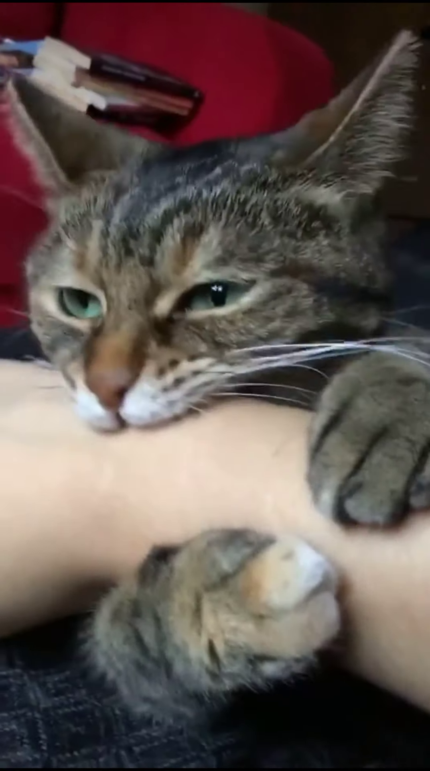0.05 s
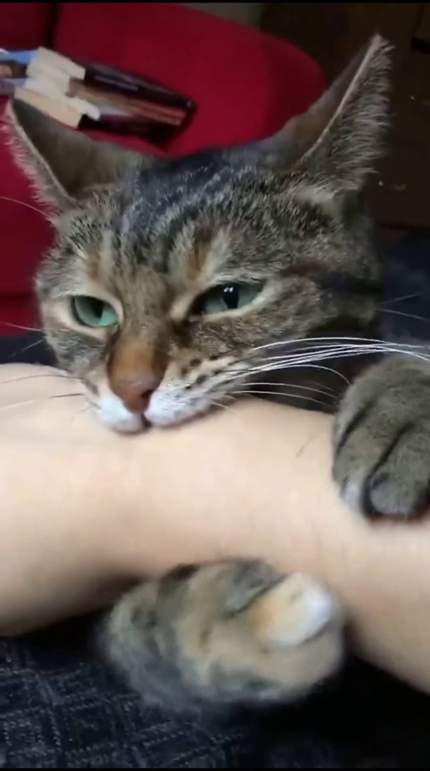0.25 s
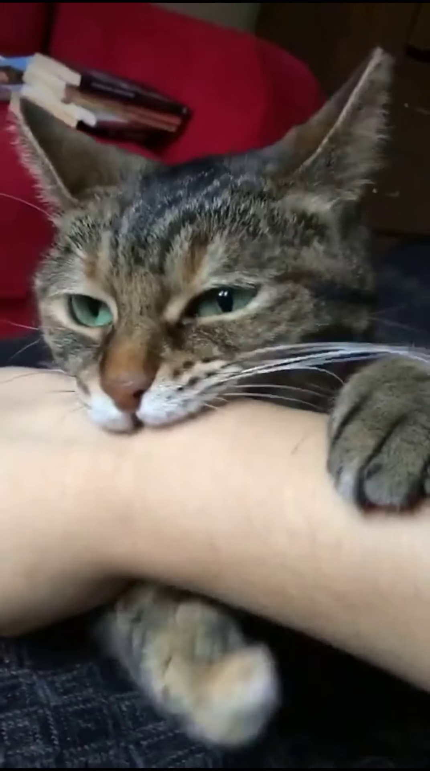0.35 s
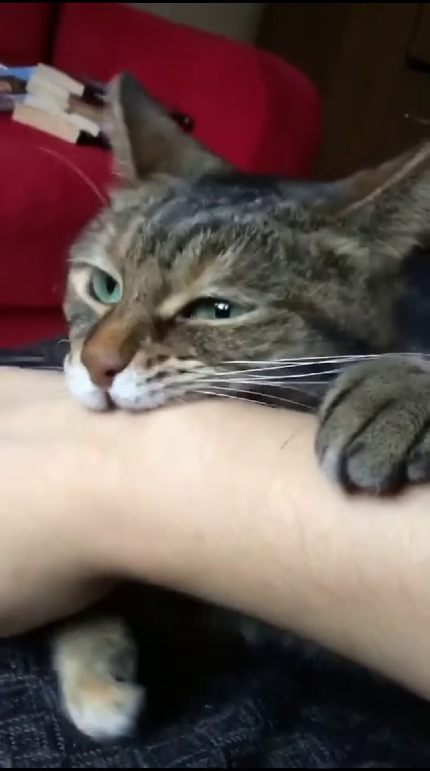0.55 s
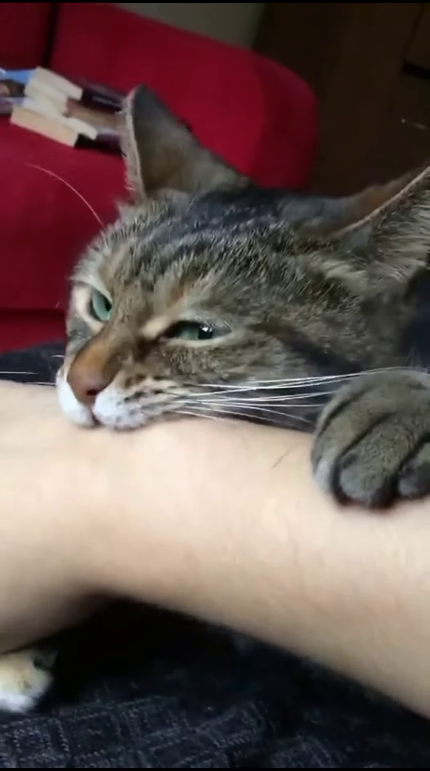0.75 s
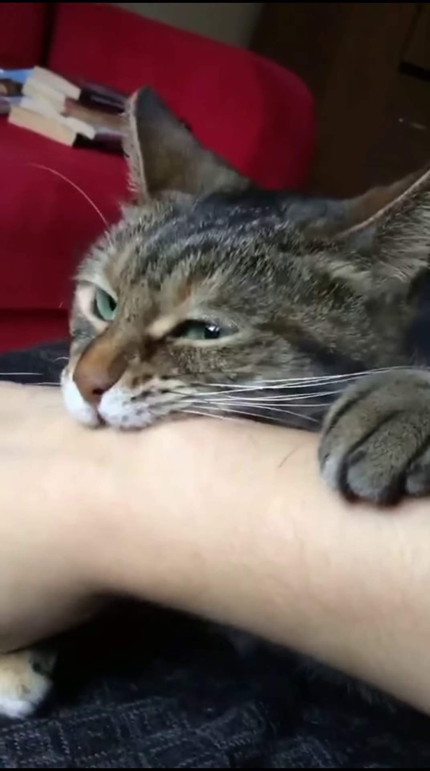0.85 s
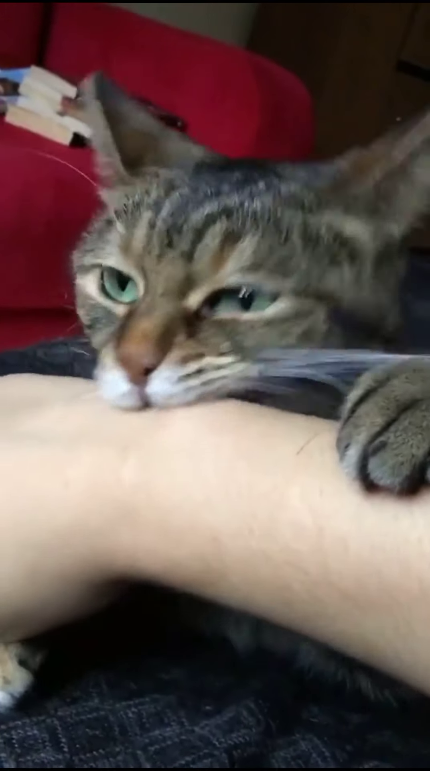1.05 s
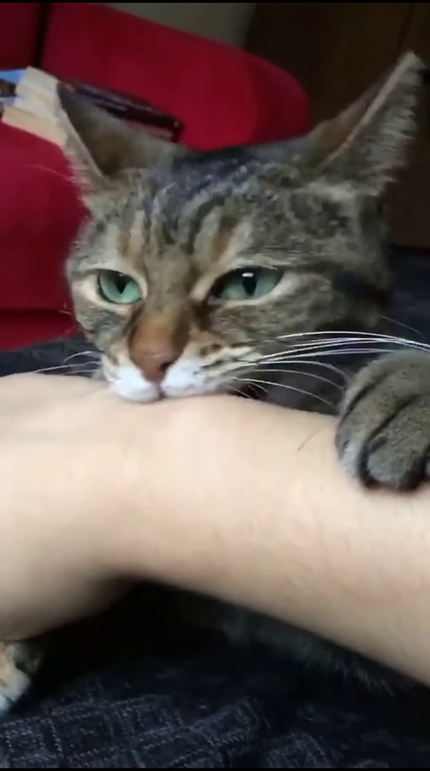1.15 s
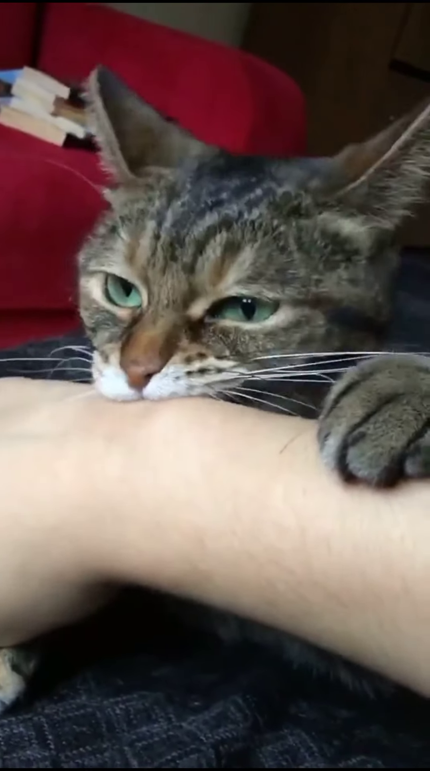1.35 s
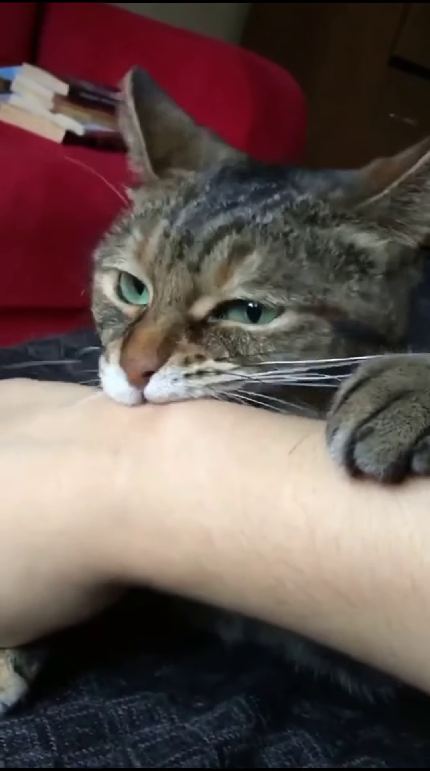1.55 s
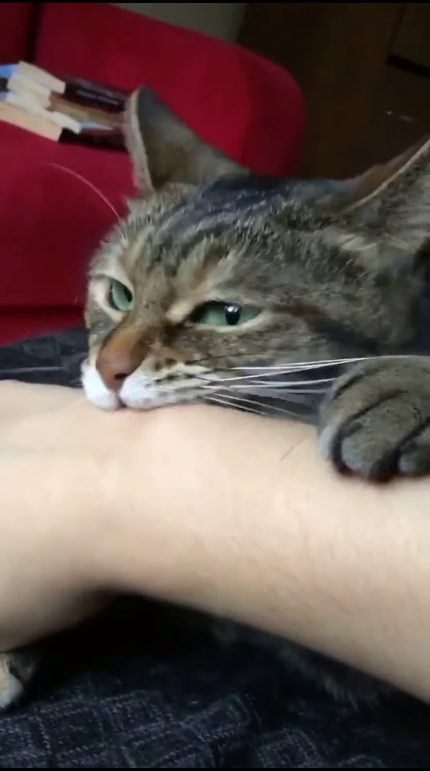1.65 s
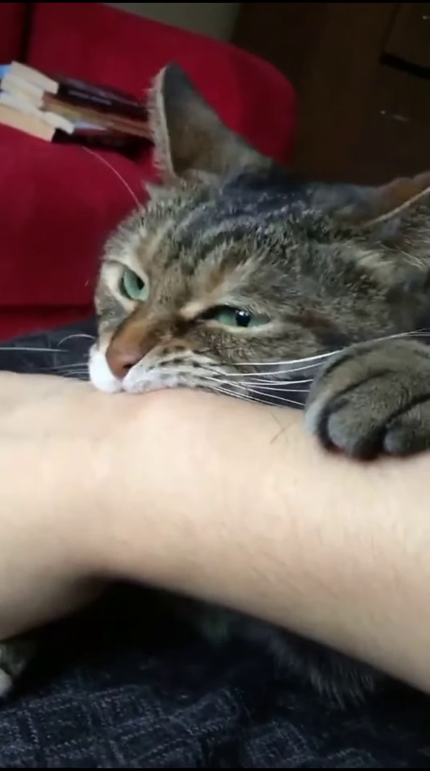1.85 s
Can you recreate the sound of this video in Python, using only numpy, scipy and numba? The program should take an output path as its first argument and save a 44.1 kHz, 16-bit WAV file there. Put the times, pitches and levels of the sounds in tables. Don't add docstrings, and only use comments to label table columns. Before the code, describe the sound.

A cat gives one drawn-out, nasal meow close by, rising then slowly falling, in a quiet room

```python
import sys
import numpy as np
from scipy import signal
from scipy.io import wavfile
from scipy.ndimage import uniform_filter1d
from numba import njit

SR = 44100
rng = np.random.default_rng(int(sys.argv[2]) if len(sys.argv) > 2 else 0)


def rack_gain(trim_db):
    fader = np.asarray(trim_db, float)
    return 10 ** (fader / 20)


def int16_out(signal):
    q = np.round(np.clip(np.atleast_2d(signal).T, -1, 1) * 32767)
    wavfile.write(sys.argv[1], SR, q.astype(np.int16))


N = 83790

# freq_hz, density_db_per_hz
ROOM_SPECTRUM = [(30, -51.5), (44, -10.5), (95, -9.5), (150, -7), (330, -12.5), (600, -21.5), (1900, -29),
                 (5500, -44.5)]
# start_s, peak_db, freq_hz, t60_s
LIP_TICKS = [
    (1.638, -60, 8400, .004),
    (.641, -59, 6200, .004),
    (.648, -60, 6500, .004),
    (.45, -48, 700, .012),
]
# time_s, level_db
EFFORT = [(.21, -37.5), (.29, -41.5), (.34, -38.5), (.52, -36.5), (.95, -37.5), (1.035, -40.5), (1.07, -37),
          (1.175, -37), (1.204, -44)]
# time_s, pitch_hz
PITCH = [(0.215, 445.5), (0.233, 448), (0.239, 431.4), (0.307, 454), (0.381, 495.2), (0.461, 524.6),
         (0.5, 528.5),
         (0.53, 525), (0.63, 529.6), (0.774, 521.5), (0.998, 495), (1.072, 477), (1.098, 458.2),
              (1.166, 460.7), (1.19, 438.7)]
# time_s, resonance_hz, nasal_dip_hz
MOUTH = [(.2, 520, 1410), (.3, 706, 1446), (.42, 1044, 1503), (.48, 1130, 1740), (.6, 1135, 1774),
         (.79, 939, 1590), (.92, 913, 1550), (1.04, 820, 1700), (1.2, 537, 1570)]
# time_s, tongue_hz, tongue_db, throat_hz, throat_db
TONGUE = [(.238, 2100, -39, 3830, -35.5), (.255, 2140, -20, 3930, -33), (.35, 2193, -8.5, 4040, -30),
          (.47, 2230, -17.5, 4000, -42), (.7, 2220, -10, 3545, -32.5), (.93, 2180, -17.5, 3504, -33),
          (1.05, 2180, -11, 3500, -32), (1.16, 2316, -38, 3520, -30), (1.19, 2283, -19, 3560, -22.5)]
# time_s, whistle_hz, whistle_db, lip_gap_db, breath_db
LIPS = [(.22, 6030, -33.5, -65, -77), (.32, 5680, -19, -63, -69.5), (.43, 5270, -36.5, -52, -69.5),
        (.46, 5290, -25, -34.5, -62), (.61, 5260, -25.5, -37.5, -62.5), (.67, 5190, -25, -35.5, -90),
        (.76, 5410, -25, -39, -98), (.84, 5720, -36.5, -37, -83.5), (1.08, 5757, -34.5, -60, -75.5)]

START_S, STOP_S, ATTACK_S, RELEASE_S = .1965, 1.2105, 0.001, 0.0032
CATCH_HZ, CATCH_S, CATCH_DB = 168.4, 0.0036, 5.5
CLOSE_HZ, CLOSE_S, CLOSE_DB = 170, 0.0037, 17.5
FLUTTER_HZ, FLUTTER_DB, FLUTTER_S, FLUTTER_DIP_S = 21, 3, .1, .242
TILT_DB_PER_OCT = -3.5
MOUTH_W_HZ, NASAL_W_HZ, DIP_W_HZ = 530, 235, 30
TONGUE_W_HZ, THROAT_W_HZ, WHISTLE_W_HZ = 255, 410, 355
LIP_HZ, LIP_W_HZ, AIR_HZ, AIR_W_HZ = 7330, 1670, 9200, 1900
CHEEK_HZ = 2540
JITTER_RATIO, SHIMMER_DB = 0.00168, 1.29
BURR_DB, BURR_PER_S = 3, 110
RASP_DB, RASP_PER_DB, SHEEN_DB = -100, 4, -3.5
ECHO_S, ECHO_DB = .034, -18
ROOM_DB, DUCK_DB = -60, -2
CONTROL_STEP = 30


def walk(rate_hz):
    hold = int(SR / rate_hz)
    steps = np.repeat(rng.standard_normal(N // hold + 1), hold)
    return 1.4 * uniform_filter1d(uniform_filter1d(steps, hold), hold)[:N]


def columns(table, t, smooth_s=0.0071):
    rows = np.array(table, float).T
    width = int(smooth_s * SR) + 1
    return [uniform_filter1d(np.interp(t, rows[0], c), width) for c in rows[1:]]


def band(f, hz, width_hz):
    return 1j * f * width_hz / (hz ** 2 - f ** 2 + 1j * f * width_hz)


def ring(x, hz, width_hz):
    return signal.lfilter(*signal.iirpeak(hz, hz / width_hz, fs=SR), x)


@njit
def moving_ring(x, hz, width_hz):
    y, b, l = np.empty(len(x)), 0., 0.
    for i in range(len(x)):
        g, k = np.tan(np.pi * hz[i] / SR), width_hz / hz[i]
        v = (b + g * (x[i] - l)) / (1 + g * (g + k))
        b, l, y[i] = 2 * v - b, l + 2 * g * v, k * v
    return y


def room(duck_db):
    out, swell = 0, walk(1.1)
    rows = np.array(ROOM_SPECTRUM)
    for hz in 32 * 2 ** np.arange(0, 8.9, 1 / 3):
        db = np.interp(np.log(hz), np.log(rows[:, 0]), rows[:, 1])
        db = db - 4 * np.abs(np.log2(max(hz, 9000) / 9000))
        db = db + (.6 * swell + 1.5 * walk(12) if hz < 500 else duck_db)
        noise = rng.standard_normal(N)
        out = out + rack_gain(db) * ring(ring(noise, hz, hz / 3), hz, hz / 3)
    return out * rack_gain(ROOM_DB) / np.sqrt(np.mean(out ** 2))


def ticks(t):
    out = 0
    for start_s, peak_db, hz, t60_s in LIP_TICKS:
        decay = np.exp(-np.log(1000) * np.maximum(t - start_s, 0) / t60_s)
        out = out + rack_gain(peak_db) * (t > start_s) * decay * np.sin(2 * np.pi * hz * (t - start_s))
    return out


def breath(turn, whistle_hz, lip_db, breath_db):
    puff = rng.standard_normal(N) * (1 + turn.real)
    hiss = ring(ring(puff, 8500, 3600), 8500, 3600)
    hiss = hiss + .45 * moving_ring(puff, whistle_hz, 900.)
    hiss = hiss + rack_gain(SHEEN_DB) * ring(puff, 12000, 2500)
    rasp = rack_gain(RASP_DB + RASP_PER_DB * lip_db + 11 * walk(70)) * ring(puff, 1400, 2400)
    return rasp + rack_gain(breath_db + 6 + 1.5 * walk(80)) * hiss


def mouth_path(f, k, mouth_hz, dip_hz):
    low = band(f, mouth_hz, MOUTH_W_HZ) * mouth_hz / f * rack_gain(TILT_DB_PER_OCT * np.log2(k))
    low = low * band(f, dip_hz, NASAL_W_HZ) / band(f, dip_hz, DIP_W_HZ)
    return low / (1 + (f / CHEEK_HZ) ** 6)


def upper_path(f, low, tongue_curves, lip_curves):
    tongue_hz, tongue_db, throat_hz, throat_db = tongue_curves
    whistle_hz, whistle_db, lip_db = lip_curves
    mouth_phase = low / np.abs(low)
    tongue = rack_gain(tongue_db) * np.abs(band(f, tongue_hz, TONGUE_W_HZ)) ** 2 * mouth_phase
    throat = rack_gain(throat_db) * band(f, throat_hz, THROAT_W_HZ) ** 2
    whistle = rack_gain(whistle_db) * band(f, whistle_hz, WHISTLE_W_HZ) ** 2
    gap = rack_gain(lip_db) * (band(f, LIP_HZ, LIP_W_HZ) ** 2 - band(f, AIR_HZ, AIR_W_HZ) ** 2)
    return tongue - throat + whistle - gap


def meow(t):
    since_start_s = np.maximum(t - START_S, 0)
    catch = np.exp(-since_start_s / CATCH_S)
    close = np.exp(-np.maximum(STOP_S - t, 0) / CLOSE_S)
    pitch_hz = columns(PITCH, t, .02)[0]
    pitch_hz = pitch_hz * (1 + JITTER_RATIO * walk(60)) + CATCH_HZ * catch + CLOSE_HZ * close
    turn = np.exp(2j * np.pi * np.cumsum(pitch_hz) / SR)

    slow = slice(None, None, CONTROL_STEP)
    mouth_hz, dip_hz = (c[slow] for c in columns(MOUTH, t))
    tongue_curves = [c[slow] for c in columns(TONGUE, t, 0.0073)]
    whistle_hz, whistle_db, lip_db, breath_db = columns(LIPS, t)
    lip_curves = [c[slow] for c in (whistle_hz, whistle_db, lip_db)]
    settled = np.clip(1 - catch - close, 0, 1)[slow]
    burr_depth = np.clip((breath_db + 88) / 14, .2, 1)
    burr = rack_gain(BURR_DB * (walk(BURR_PER_S) * burr_depth)[slow])

    voice, first, tone = 0, 0, 1
    for k in range(1, 27):
        f = k * pitch_hz[slow]
        tone = tone * turn
        low = mouth_path(f, k, mouth_hz, dip_hz)
        if k == 1:
            first = np.abs(low)
        high = upper_path(f, low, tongue_curves, lip_curves) * (burr if k > 8 else 1)
        shimmer = rack_gain(SHIMMER_DB * min(k / 4, 2.5) * walk(29.32)[slow])
        gain = (low / first + high) * settled ** (k - 1) * shimmer
        voice = voice + np.real(np.interp(t, t[slow], gain) * tone)

    flutter_cycle = np.cos(2 * np.pi * FLUTTER_HZ * (t - FLUTTER_DIP_S))
    flutter_db = -FLUTTER_DB * np.exp(-since_start_s / FLUTTER_S) * flutter_cycle
    effort_db = columns(EFFORT, t, .01)[0] + flutter_db + CATCH_DB * catch + CLOSE_DB * close
    voice = voice * np.sqrt(2) * rack_gain(effort_db)
    on = np.clip((t - START_S) / ATTACK_S, 0, 1) * np.clip((STOP_S - t) / RELEASE_S, 0, 1)
    return on * (voice + breath(turn, whistle_hz, lip_db, breath_db))


def scene():
    t = np.arange(N) / SR
    cat = meow(t)
    echo = ring(np.interp(t - ECHO_S, t, cat), 610, 390)
    loud = uniform_filter1d(cat ** 2, 2000)
    background = room(DUCK_DB * loud / loud.max())
    return (cat + rack_gain(ECHO_DB) * echo + ticks(t) + background)[None]


def band_limit(x):
    return signal.sosfilt(signal.butter(12, 12950, fs=SR, output="sos"), x)


def record(dry):
    low_pass = signal.ellip(8, .2, 22, 12950, fs=SR, output="sos")
    mix = signal.sosfilt(low_pass, dry)
    return band_limit(mix)


dry = scene()
out = record(dry)
int16_out(out)
```